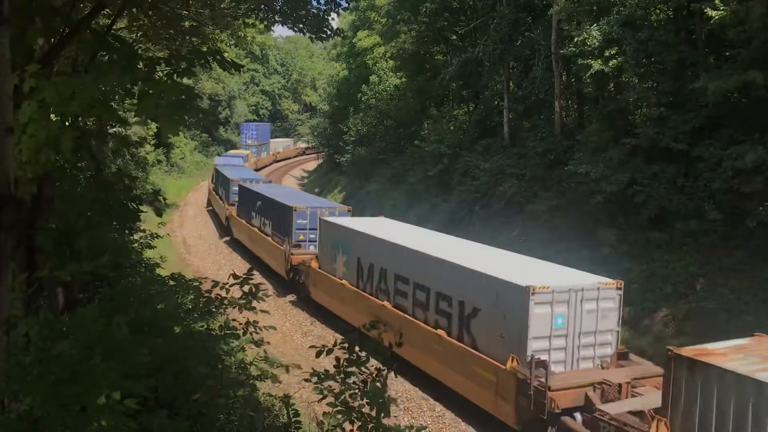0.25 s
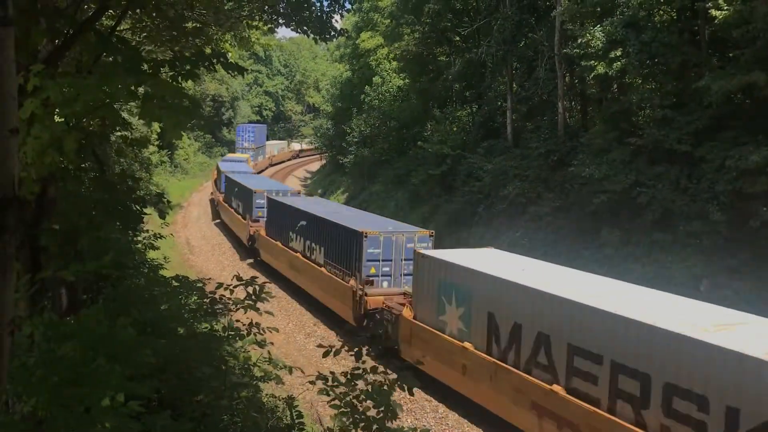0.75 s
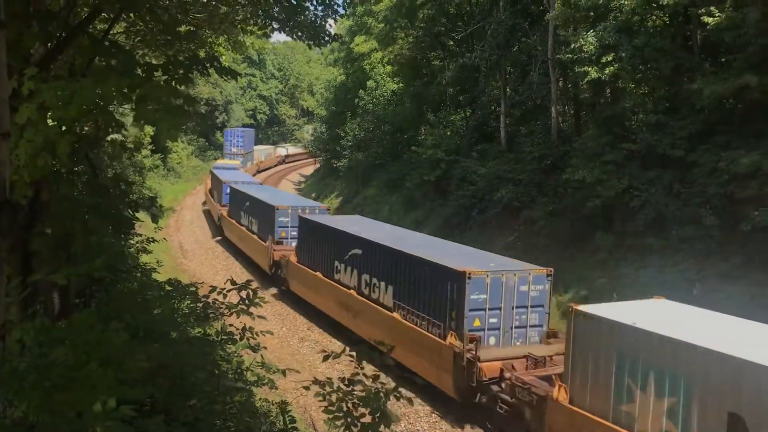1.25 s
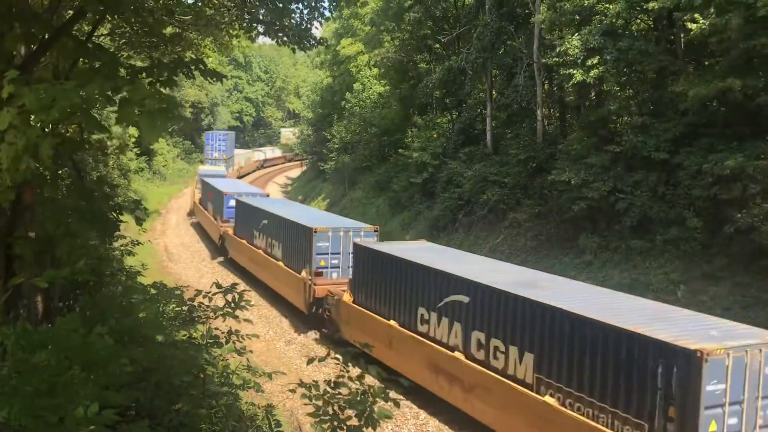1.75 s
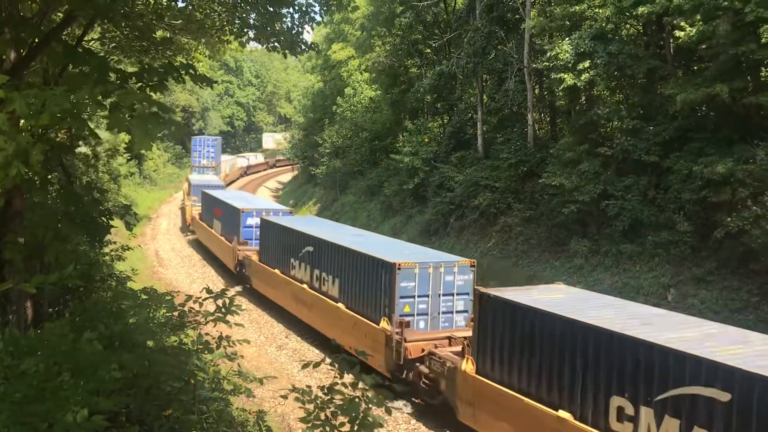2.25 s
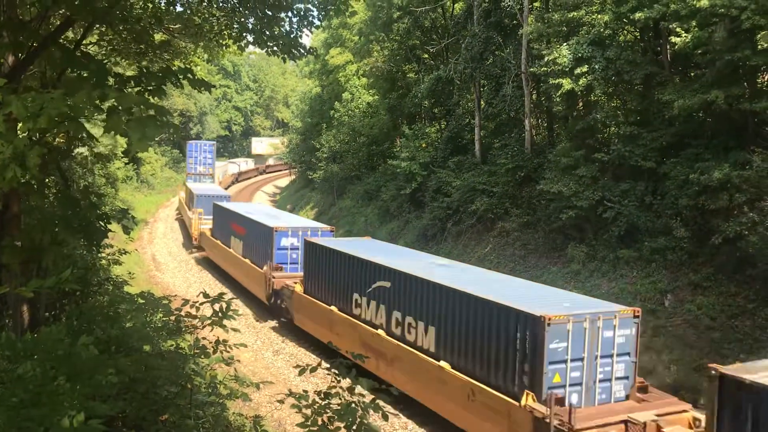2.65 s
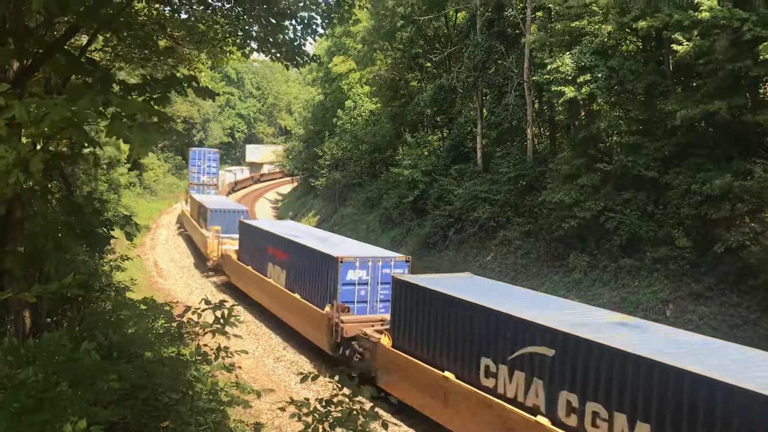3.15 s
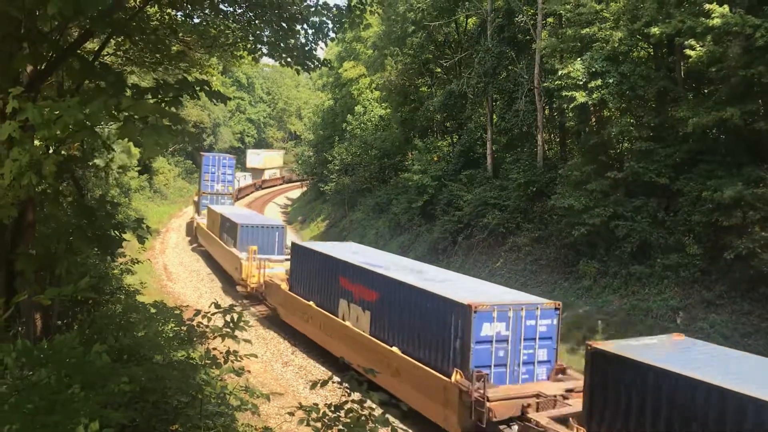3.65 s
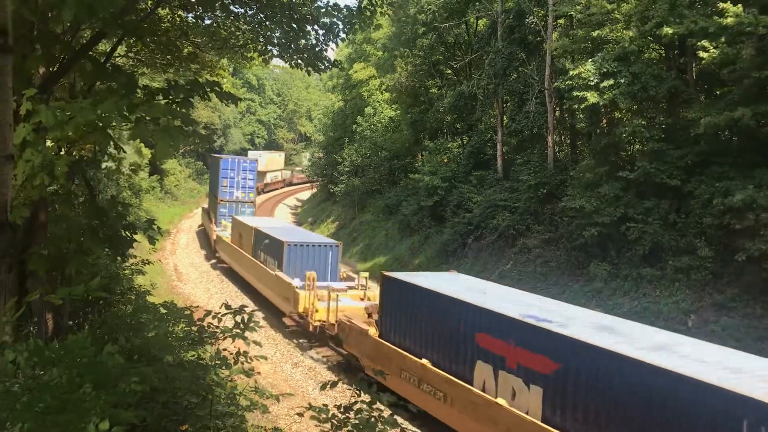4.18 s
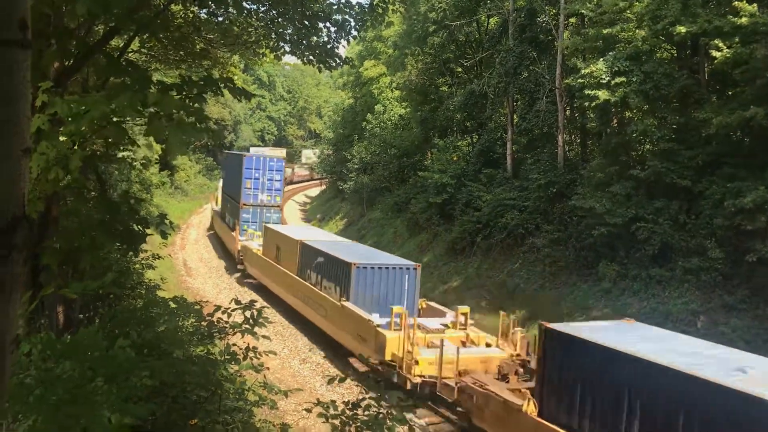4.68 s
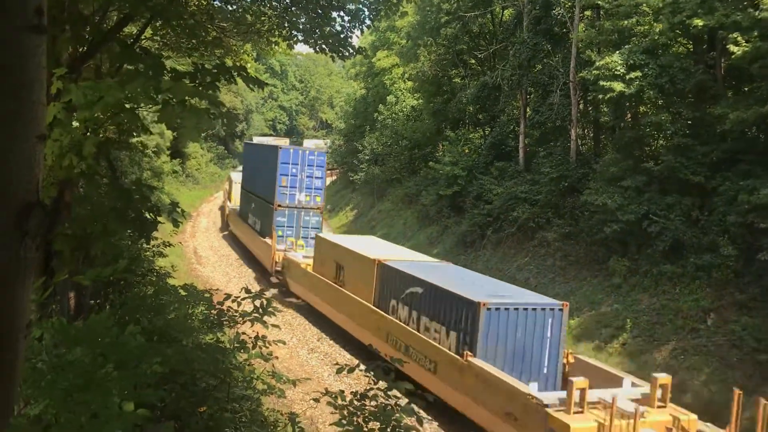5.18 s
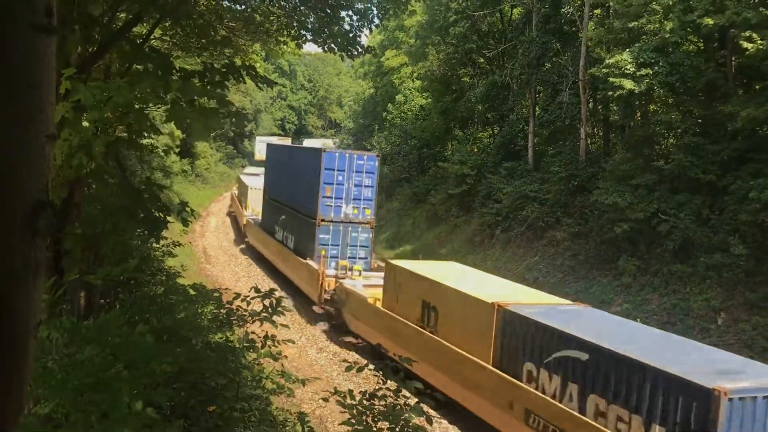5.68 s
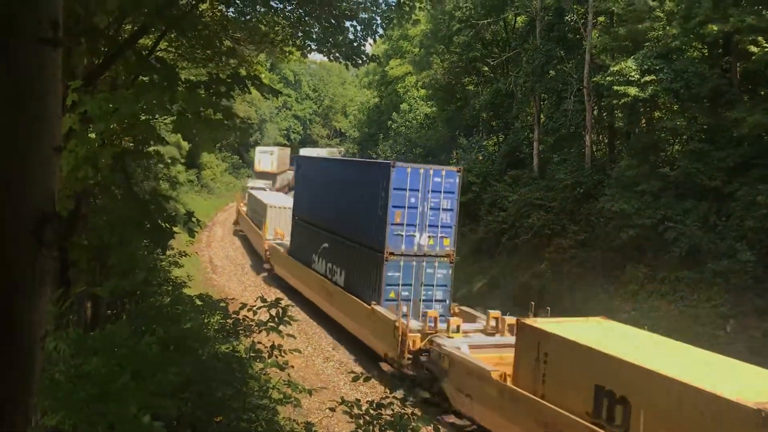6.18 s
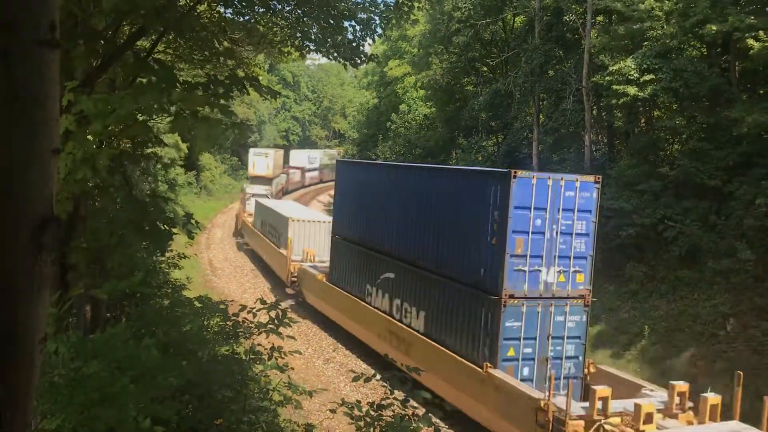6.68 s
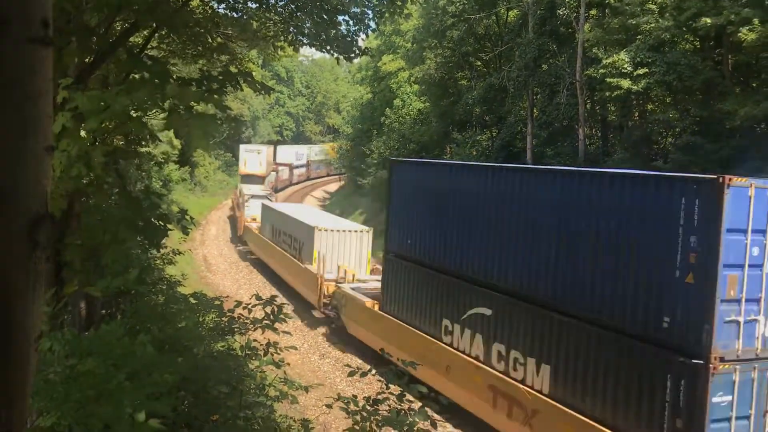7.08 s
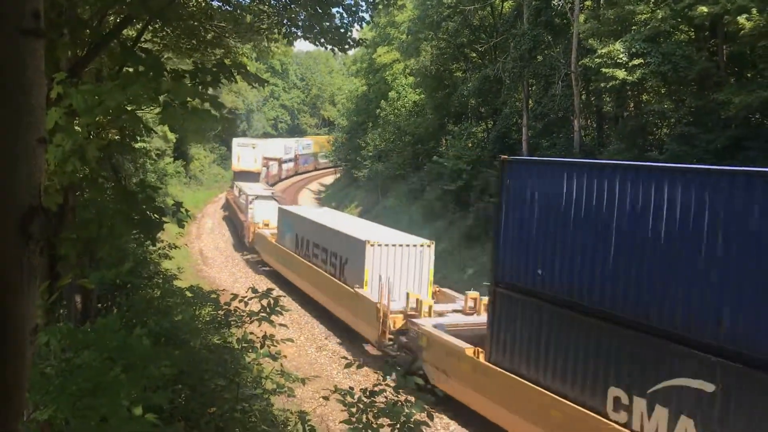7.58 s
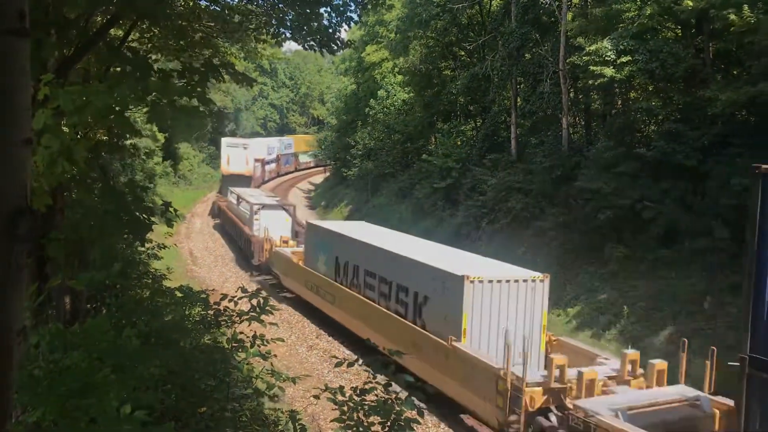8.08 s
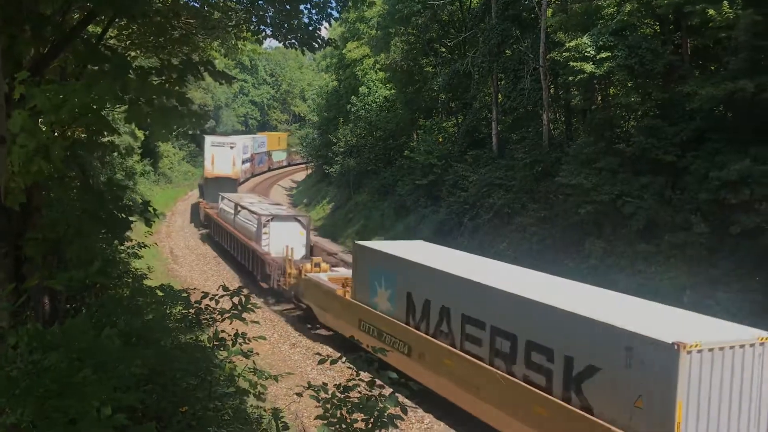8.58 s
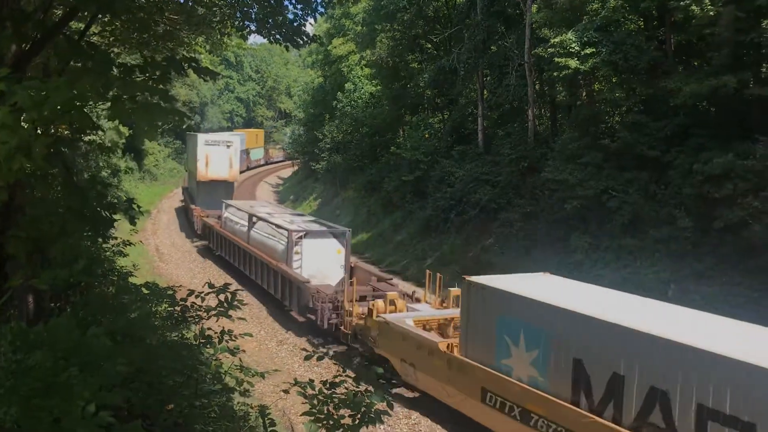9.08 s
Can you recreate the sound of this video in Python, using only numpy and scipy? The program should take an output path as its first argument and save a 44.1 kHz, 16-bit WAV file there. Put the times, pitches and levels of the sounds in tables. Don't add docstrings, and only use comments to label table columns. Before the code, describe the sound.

From 0 s a freight train is already rolling by: low, uneven rumble, shaking ground, mid-range steel roll and breathy high hiss, with faint short metal rings. The hiss brightens around 2 s, then thins. From about 2.5 to 5 s a distant wheel squeals thinly near 2.8 kHz. From about 3 s a nearer, higher squeal near 3.7 kHz joins it, swelling in jagged bursts from 4.7 s and peaking piercingly at 5.6-5.9 s as it passes close and glides down slightly. Trees smear it into a dense ringing echo, with rasp and a weak octave. The level ducks around 5.8-6.7 s, then recovers. A brief squeal returns near 7 s while flange hiss flares; weaker whines follow at 7.5 and 8-9 s. Rumble and hiss continue to the end at 9.3 s. Mono, outdoors, close trackside microphone.

```python
import sys
import numpy as np
from scipy import signal
from scipy.fft import rfft, irfft, next_fast_len
from scipy.io import wavfile
from scipy.ndimage import uniform_filter1d, minimum_filter1d

SR = 44100
rng = np.random.default_rng(int(sys.argv[2]) if len(sys.argv) > 2 else 0)


def int16_out(signal):
    q = np.round(np.clip(np.atleast_2d(signal).T, -1, 1) * 32767)
    wavfile.write(sys.argv[1], SR, q.astype(np.int16))


def attenuation_scalar(level_db):
    decades = np.asarray(level_db, float) / 20
    return 10 ** decades


N = 411894
TIME = np.arange(N) / SR


def rms_one(x):
    return x / np.sqrt(np.mean(np.abs(x) ** 2) + 1e-20)


def in_time(rows):
    s, value = np.transpose(rows)
    return np.interp(TIME, s, value)


def window(start, end, fade=0.81):
    return np.clip(np.minimum(TIME - start, end - TIME) / fade + 1, 0, 1) ** 2


def swells(times, lengths, heights):
    out = np.zeros(N)
    for s, length, height in zip(times, lengths, heights):
        out += height * np.cos(np.pi * np.clip((TIME - s) / length, -.5, .5)) ** 2
    return out


def seizing(rows):
    s, peak_db, length = np.transpose(rows)
    return swells(s, length, attenuation_scalar(peak_db))


def drift(rate_hz):
    r = np.exp(-2 * np.pi * rate_hz * 32 / SR)
    noise = rng.standard_normal(N // 32 + 2002)
    slow = signal.lfilter([1], [1, -2 * r, r * r], noise)[2000:]
    return np.interp(np.arange(N) / 32, np.arange(len(slow)), rms_one(slow))


def shaped(gain_at):
    hz = np.maximum(np.fft.rfftfreq(next_fast_len(N), 1 / SR), 1)
    real, imaginary = rng.standard_normal((2, len(hz)))
    return rms_one(irfft((real + 1j * imaginary) * gain_at(hz))[:N])


def spectrum(points, low_hz, high_hz):
    hz_at, level_db = np.transpose(points)

    def gain_at(hz):
        edges = (1 + (low_hz / hz) ** 6) * (1 + (hz / high_hz) ** 6)
        return attenuation_scalar(np.interp(np.log(hz), np.log(hz_at), level_db)) / np.sqrt(edges)
    return gain_at


def phase_of(hz):
    return 2 * np.pi * np.cumsum(hz * np.ones(N)) / SR


def narrow(hz, width_hz):
    phase = phase_of(hz)
    return drift(width_hz) * np.cos(phase) + drift(width_hz) * np.sin(phase)


def tone(hz, wander_hz, flutter_db):
    flutter = attenuation_scalar(flutter_db * drift(15.5))
    return np.sqrt(2) * flutter * np.sin(phase_of(hz + wander_hz * drift(12.1)))


def tree_echo(low_hz, high_hz, pitch_hz, focus_db, edge_hz):
    centres = np.linspace(low_hz, high_hz, num=6)
    spacing = centres[1] - centres[0]
    out, power = 0, 0
    for centre in centres:
        gain = attenuation_scalar(-focus_db * np.abs(centre - pitch_hz) / 100)
        if centre in (low_hz, high_hz):
            gain = gain * .72

        def strip(hz):
            outside_hz = np.maximum(np.maximum(low_hz - hz, hz - high_hz), 0)
            edge = 1 / (1 + (outside_hz / edge_hz) ** 2)
            return edge * np.sqrt(np.clip(1 - np.abs(hz - centre) / spacing, 0, 1))
        out = out + gain * shaped(strip)
        power = power + gain ** 2
    return out / np.sqrt(power)


# (start [s], length [s], frequency [Hz], width [Hz], level [dB])
RINGING = [(1.39, 0.14, 1200, 900, -33), (2.36, .3, 1965, 39, -37), (2.6, .6, 1965, 40, -43),
           (2.47, .9, 365, 35, -28), (3.5, .55, 355, 70, -25), (-.5, 1.7, 600, 200, -36),
           (5.6, 1.1, 650, 70, -37), (8.55, .12, 5200, 1800, -39), (2.2, .18, 2350, 65, -43),
           (7, .3, 1050, 110, -39), (5.3, 0.47, 570, 65, -37), (-1, 1.3, 4600, 250, -42),
           (8.1, .4, 12400, 1000, -36), (8.15, .6, 15550, 120, -46), (6.68, .4, 290, 60, -29),
           (7.75, .4, 210, 36, -34), (8.4, 0.37, 200, 40, -33), (0.55, .5, 65, 25, -27.5),
           (-0.6, .8, 2900, 500, -41), (2.5, .4, 3270, 30, -45), (8.5, .25, 5600, 60, -43)]


def ringing():
    out = np.zeros(N)
    for start, length, hz, width_hz, level_db in RINGING:
        first, last = max(round(start * SR), 0), round((start + length) * SR)
        swell = np.sqrt(np.abs(np.sin(np.pi * (TIME[first:last] - start) / length)))
        r = np.exp(-np.pi * width_hz / SR)
        resonance = [1, -2 * r * np.cos(2 * np.pi * hz / SR), r * r]
        noise = signal.lfilter([1, 0, -1], resonance, rng.standard_normal(last - first))
        out[first:last] += attenuation_scalar(level_db) * swell * rms_one(noise)
    return out


# (frequency [Hz], level [dB per Hz])
RUMBLE = [(13, -43), (22, -41), (44, -3.5), (70, 2), (109, -2.5), (169, -10), (272, -4.5), (360, -7),
          (486, -12), (605, -12), (785, -18), (1400, -23), (1580, -21.5), (2600, -23), (3380, -40),
          (5720, -120)]
# (frequency [Hz], level [dB per Hz])
HISS = [(1500, -30), (2600, -1), (3300, 1), (4400, -1.5), (6500, -3.5), (9200, -6.5), (10400, -7.5),
        (11500, -5), (13500, -8.5), (15800, -8.5)]
# (time [s], level [dB])
LOAD = [(0, -20.5), (.4, -23), (.8, -21), (1.5, -26), (1.9, -23.5), (2.7, -24.5), (3.05, -25), (3.55, -28),
        (4.1, -26), (4.8, -28.5), (5.2, -28), (5.9, -29.5), (6.5, -20.5), (7, -22), (8, -21), (9.1, -25.5),
        (9.34, -21)]
# (time [s], level [dB])
CONTACT = [(0, -57.5), (1.1, -52.5), (1.6, -49), (1.9, -45.5), (2.3, -49), (2.8, -53.5), (3.5, -62.5),
           (4.2, -59.5), (5.1, -56.5), (5.55, -51.5), (6, -54.5), (6.5, -50), (7.1, -42.5), (7.9, -49.5),
           (8.3, -45), (8.7, -47), (9.34, -54)]
# (time [s], length [s], bodies [dB], rail [dB])
BOGIES = [(0, 1, -.5, 2.5), (1.467, .2, 1.5, 2), (1.7, .5, 0.5, 2), (2.3, .5, 0, 2), (2.9, .6, .1, 1.5),
          (3.2, .4, .5, -1), (3.9, 0.38, 2.5, 0.5), (4.562, 0.25, 3.5, 0.5), (5.198, 0.7, 1, 0.5),
          (6.9, 0.78, 1, 0), (8.65, 0.4, 1, -0.5)]


def rolling():
    load_db, contact_db = in_time(LOAD), in_time(CONTACT)
    s, length, body_db, rail_db = np.transpose(BOGIES)
    body_db = -25.95 + swells(s, length, body_db)
    rail_db = -30.14 + swells(s, length, rail_db)
    lighter_cars = (1 + np.tanh(2 * (TIME - 4.8))) / 2
    shake_db = -30 + .4 * (load_db - load_db.mean()) - 9 * lighter_cars
    hiss_db = -31.08 + 0.36 * (contact_db - contact_db.mean())
    joints = drift(2.5)
    ground = attenuation_scalar(load_db - 1 + .5 * joints + 1.45 * drift(12)) * shaped(spectrum(RUMBLE, 55.5, 175))
    shaking = attenuation_scalar(shake_db + 2.5 * drift(1.5)) * shaped(spectrum(RUMBLE, 18, 42))
    body = attenuation_scalar(body_db + 0.87 * joints + drift(3.5)) * shaped(spectrum(RUMBLE, 149, 506))
    rail = attenuation_scalar(rail_db + .5 * joints + drift(23)) * shaped(spectrum(RUMBLE, 640, 2310))
    hiss = attenuation_scalar(hiss_db + 0.6 * drift(6)) * shaped(spectrum(HISS, 2000, 30000))
    return ground + shaking + body + rail + hiss


# (frequency [Hz], width [Hz], level [dB])
WHEEL_MODES = [(4300, 120, 1.5), (5480, 170, 2), (6010, 140, 6.5), (7050, 250, 7), (7930, 110, 1),
               (8900, 310, 8.5), (9860, 280, 5.5), (11420, 460, 7), (12070, 260, 5), (12750, 180, 4),
               (13700, 400, 5)]
# (time [s], Doppler ratio [1])
FLANGE_SHIFT = [
    (0, .964),
    (3.3, .954),
    (4, .99),
    (5.8, .985),
    (6.4, .995),
    (7.8, .988),
    (8, 1.003),
    (9.34, .998),
]


def flanges():
    shift, grip = in_time(FLANGE_SHIFT), drift(4.6)
    out = np.zeros(N)
    for hz, width_hz, level_db in WHEEL_MODES:
        out += attenuation_scalar(level_db - 1 + 2.3 * drift(8.5)) * narrow(hz * shift, width_hz)
    return attenuation_scalar(in_time(CONTACT) + 0.3 * grip) * out


# (time [s], level [dB])
FAR_SLIP = [
    (2.2, -48),
    (2.55, -35),
    (3, -34.5),
    (3.55, -31.5),
    (3.9, -34),
    (4.4, -35.5),
    (4.8, -41),
    (5.3, -51),
    (5.7, -55),
]
# (time [s], peak level [dB], length [s])
FAR_SEIZES = [
    (2.72, -34, .2),
    (3.05, -31, .3),
    (3.4, -28, 0.29),
    (3.58, -31, 0.27),
    (3.8, -31, 0.27),
    (4.05, -40, 0.25),
    (4.45, -41, .1),
    (4.79, -29, 0.093),
]


def far_wheel():
    going_hz, coming_hz = 2660, 2854
    slip = attenuation_scalar(in_time(FAR_SLIP))
    strength = attenuation_scalar(-3.5) * (seizing(FAR_SEIZES) + attenuation_scalar(-7) * slip)
    direct = strength * tone(coming_hz, wander_hz=1.5, flutter_db=1.6)
    echo = attenuation_scalar(-1.5) * slip * tree_echo(going_hz, coming_hz, coming_hz, focus_db=4.5, edge_hz=12)
    return window(2.7, 5.6, fade=.6) * (direct + echo)


# (wheel pitch [Hz], largest shift [Hz], nearest at [s], distance over speed [s])
PASS_BY = (3653.5, 139.5, 5.68, .725)
# (time [s], level [dB])
SLIP = [(0, -33.5), (.9, -29), (2.3, -28.5), (3.12, -21), (3.6, -20), (3.85, -23.5), (4.3, -17),
        (4.76, -12.5), (5.31, -12.5), (5.49, -14), (5.62, -11.5), (5.8, -13), (6.1, -10.5), (6.58, -12),
        (7, -16.5), (7.6, -16.5), (9.34, -25.5)]
# (time [s], peak level [dB], length [s])
SEIZES = [(3.2, -33, 0.13), (3.36, -29, 0.11), (3.6, -28.5, 0.32), (4.2, -25, 0.38), (4.41, -22, 0.17),
          (4.61, -20, 0.13), (4.72, -10, 0.062), (4.775, -7, 0.023), (4.86, -11, 0.053), (4.93, -12, 0.1),
          (5.04, -10, 0.041), (5.13, -21, 0.12), (5.22, -15.5, 0.11), (5.34, -9.5, 0.13), (5.44, -17, .08),
          (5.54, -9.5, 0.08), (5.62, -6, 0.15), (5.69, -8, 0.067), (5.8, -3.5, 0.28), (6.0, -13, .26),
          (6.24, -12.5, 0.22), (6.67, -20.5, 0.18), (6.98, -11.5, .1), (7.22, -34, 0.17),
          (7.51, -17.5, .14), (7.7, -25.5, 0.34), (8.12, -22, 0.18), (8.29, -25, .1), (8.48, -25, 0.62),
          (8.99, -24, 0.28)]


def near_wheel():
    wheel_hz, shift_hz, nearest, reach = PASS_BY
    distance = np.hypot(TIME - nearest, reach)
    coming = (nearest - TIME) / distance
    pitch_hz = wheel_hz + shift_hz * coming
    slip_db = in_time(SLIP)
    strength = seizing(SEIZES) + window(2.8, 10) * attenuation_scalar(slip_db - 11.5)
    direct = strength * tone(pitch_hz, wander_hz=1.94, flutter_db=1.25)

    above_hz = np.maximum(pitch_hz, wheel_hz + 60) + 90
    below_hz = np.minimum(pitch_hz, wheel_hz - 60) - 90
    above = attenuation_scalar(slip_db - 14.5 + 2 * coming) * narrow(above_hz, width_hz=130)
    below = attenuation_scalar(slip_db - 16.5 - 3 * coming) * narrow(below_hz, width_hz=99)

    focus_db = 6 * reach / distance + 4.5 * (1 - coming) / 2
    going_hz, coming_hz = 3530, 3788
    echo = tree_echo(going_hz, coming_hz, pitch_hz, focus_db, edge_hz=17)
    echo = attenuation_scalar(slip_db - 2 + 0.6 * drift(12.4)) * echo

    octave_hz = 2 * wheel_hz + .8 * (pitch_hz - wheel_hz)
    octave_gain = attenuation_scalar(-33.5 + .7 * slip_db - 2.5 * coming) + attenuation_scalar(-36) * strength
    octave = window(3.2, 6.5, fade=.4) * octave_gain * narrow(octave_hz, width_hz=140)
    return direct + above + below + echo + octave


def scene():
    return (ringing() + rolling() + flanges() + far_wheel() + near_wheel())[None]


def band_limit(x):
    return signal.sosfilt(signal.butter(12, 17060, fs=SR, output="sos"), x)


# (time [s], level [dB])
GAIN = [
    (0, 0.5),
    (5.6, -0.5),
    (5.85, -7.5),
    (6.1, -8),
    (6.6, -7.5),
    (6.85, -3),
    (8.2, -2),
    (9.34, -.4),
]


def record(dry):
    dry = dry * attenuation_scalar(in_time(GAIN))
    room_left = np.minimum(attenuation_scalar(-1) / (np.abs(dry) + 1e-9), 1)
    held = dry * uniform_filter1d(minimum_filter1d(room_left, size=301), size=151)
    size, cutoff_hz = next_fast_len(N), 15730
    passed = np.fft.rfftfreq(size, 1 / SR) < cutoff_hz
    mix = irfft(rfft(held, size) * passed, size)[:, :N]
    return band_limit(mix)


dry = scene()
out = record(dry)
int16_out(out)
```